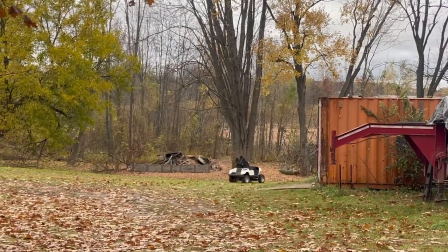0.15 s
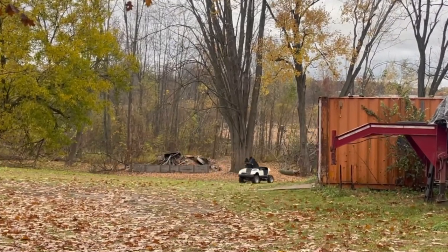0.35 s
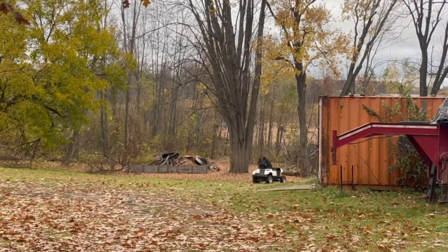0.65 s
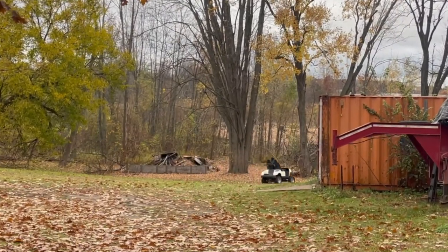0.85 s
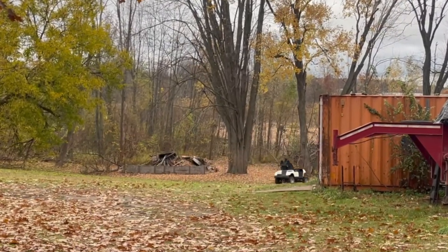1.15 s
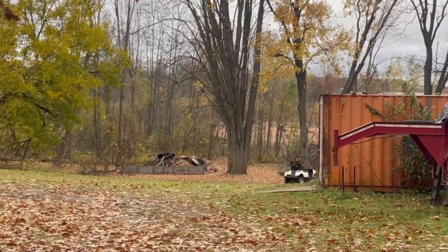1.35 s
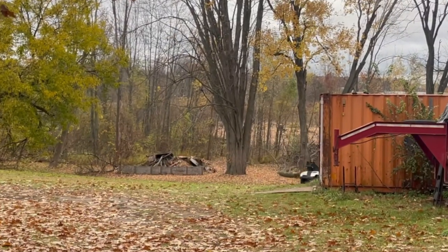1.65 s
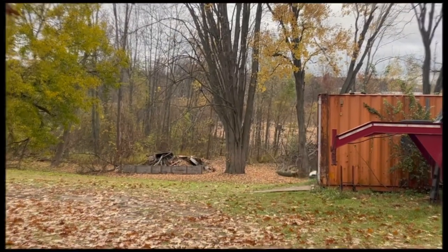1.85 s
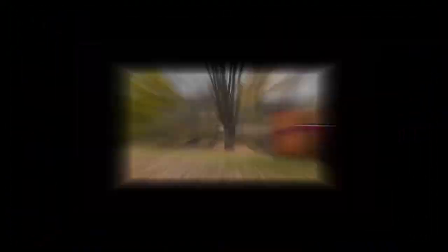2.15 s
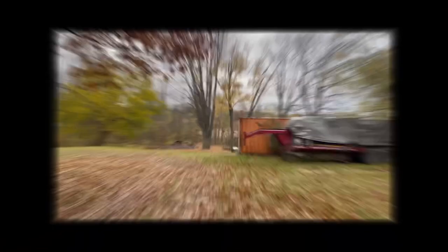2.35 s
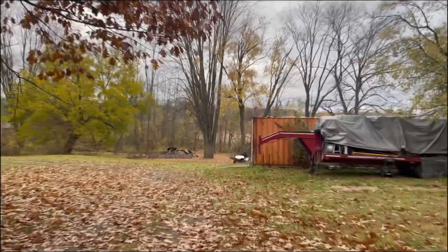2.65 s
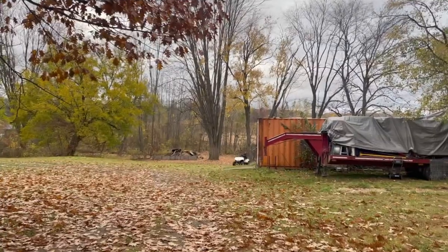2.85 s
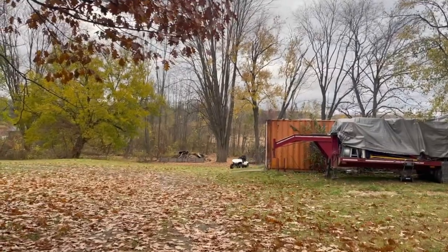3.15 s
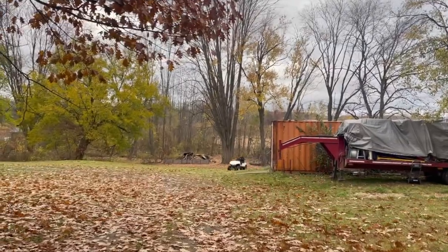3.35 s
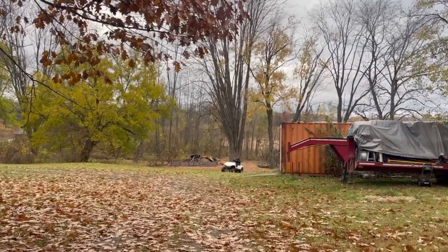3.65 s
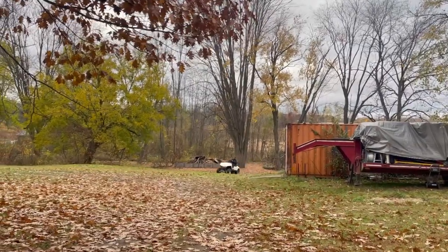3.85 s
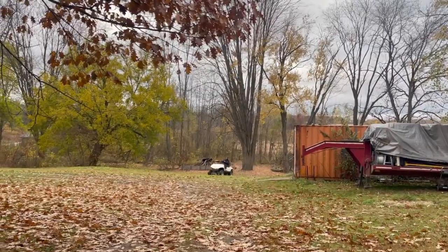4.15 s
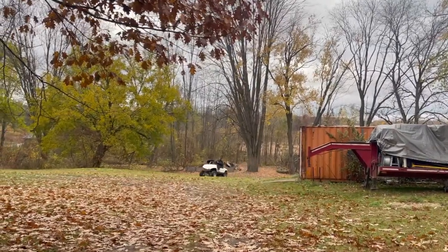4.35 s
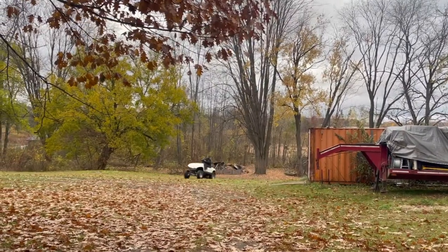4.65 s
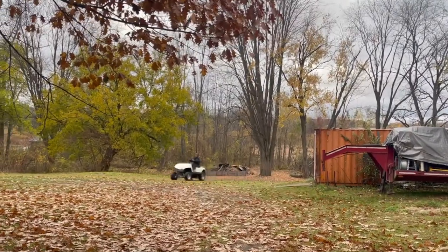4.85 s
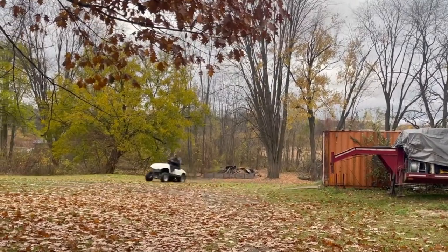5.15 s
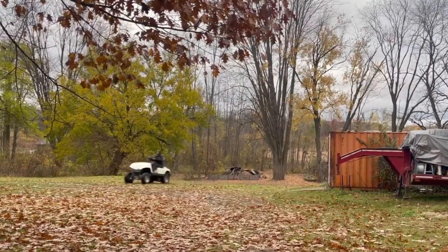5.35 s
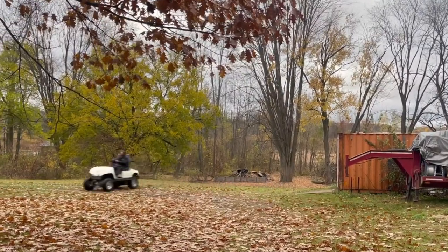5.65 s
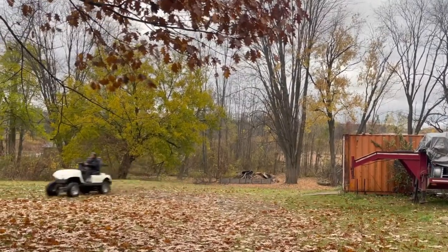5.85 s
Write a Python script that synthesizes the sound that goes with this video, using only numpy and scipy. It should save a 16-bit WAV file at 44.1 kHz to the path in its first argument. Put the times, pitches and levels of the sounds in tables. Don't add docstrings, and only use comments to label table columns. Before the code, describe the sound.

A far-off cart engine idles lumpily, its last thump the strongest, under soft wind rumble. A sudden edit with a small click jumps to quicker, even firing. A faint falling bird whistle follows, then the engine approaches, louder and brighter, with rustling tyres, loose rattles and light metal tinkling. A steel container gives short echoes; a handheld stereo microphone catches gusts in the open yard.

```python
import sys
import numpy as np
from scipy import signal
from scipy.fft import rfft, irfft
from scipy.io import wavfile
from scipy.ndimage import uniform_filter1d

SR = 44100
rng = np.random.default_rng(int(sys.argv[2]) if len(sys.argv) > 2 else 0)


def invert_db(x):
    u = np.asarray(x, float) / 20
    return 10 ** u


def store_wav(level_fs):
    pcm = np.round(np.clip(np.atleast_2d(level_fs), -1, 1) * 32767)
    wavfile.write(sys.argv[1], SR, pcm.T.astype(np.int16))


N = 264600
CUT_S = 2.2356
TIME = np.arange(N) / SR
FREQ = np.maximum(np.arange(N // 2 + 1) * SR / N, 1)
LOG_FREQ = np.log(FREQ)


def unit(x, live=slice(None)):
    return x / np.sqrt(np.mean(x[live] ** 2))


def running_rms(x):
    return np.sqrt(uniform_filter1d(x ** 2, SR // 2))


def columns(table):
    start_s, *rest = np.transpose(table)
    return [np.interp(TIME, start_s, column) for column in rest]


def on_log(hz, values):
    return np.interp(LOG_FREQ, np.log(hz), values)


def noise(gain):
    return irfft(rfft(rng.standard_normal(N)) * gain, N)


def causal(x, db):
    cepstrum = irfft(db * np.log(10) / 20, N)
    cepstrum[1:N // 2] *= 2
    cepstrum[N // 2 + 1:] = 0
    return irfft(rfft(x) * np.exp(rfft(cepstrum)), N)


def split(x, edges_hz, soft=1.074):
    below = [on_log([edge / soft, edge * soft], [1, 0]) for edge in edges_hz] + [1]
    whole = rfft(x)
    return [irfft(whole * (hi - lo), N) for lo, hi in zip([0] + below, below)]


def walk(rate_hz):
    hold = int(SR / rate_hz)
    steps = np.repeat(rng.standard_normal(N // hold + 1), hold)
    return 1.12 * uniform_filter1d(uniform_filter1d(steps, hold), hold)[:N]


def struck(t, hz, t60_s, attack_s):
    return np.minimum(t / attack_s, 1) * np.sin(2 * np.pi * hz * t) * np.exp(-np.log(1000) * t / t60_s)


# [start_s, distance_m]
DISTANCE = [(0, 50.8), (2.23, 59.5), (2.24, 43), (2.6, 35.4), (3.5, 26), (4.3, 26.6), (4.85, 12.8),
            (5.0, 14.8), (5.5, 9.5), (5.66, 6.9), (6, 5.7)]


def approach_db():
    return -20 * np.log10(columns(DISTANCE)[0] / 10)


def crank(hz, live, start, jitter):
    return start + np.cumsum(hz * live) / SR + jitter * walk(25)


# [start_s, firing_hz, load_db, second_tone_db (its part of the load), rasp_db (re load)]
IDLE = [(0.0, 28.74, -33.5, -3.5, -6), (0.25, 28.97, -37.5, -5.5, -0.5), (0.42, 28.04, -34, -5, -5),
        (0.72, 28.18, -36.5, -2, -6.5), (0.92, 29.14, -36, -0.5, -7.5), (1.25, 29.27, -36, -12.5, -5),
        (1.5, 29.4, -38, -7.5, -5), (1.75, 29.66, -37, 0, -8), (2.23, 30.26, -36, -4, -6.5)]
DRIVE = [(2.26, 46.53, -28, -5, -7), (2.41, 46.47, -21, -5, -16.5), (2.54, 46.74, -22.5, -2.5, -14),
         (2.86, 46.36, -22, -3, -13.5), (2.9, 46.35, -24.5, -3, -11.5), (3.69, 47.76, -19.5, -2, -8.5),
         (3.82, 47.25, -20, -1.5, -8.5), (4.03, 48.01, -17, -1, -10.5), (4.13, 47.26, -18, -1.5, -12),
         (4.38, 47.69, -16, -2, -13), (4.82, 47.55, -15.5, -1.5, -11), (4.93, 47.22, -15, -0.5, -13.5),
         (5.09, 48.17, -16.5, -1, -9.5), (5.31, 46.35, -14, -1, -11.5), (5.54, 46.95, -15.5, -2.5, -9.5),
         (5.72, 46.26, -14, -2.5, -11), (5.83, 48.27, -14, -4.5, -9), (5.98, 46.26, -15.5, -3, -5)]
# [start_s, [firing_multiple, level_db]]
IDLE_ORDERS = [
    (1.0, [(1, -30), (2, 21), (3, 18.5), (4, 4), (5, 11.5), (6, -13), (7, -2.5), (8, -11), (9, -9.5), (10, -18), (11, -18), (12, -24.5), (13, -16.5), (14, -31), (15, -29), (16, -27), (17, -47.5), (18, -25.5), (19, -43.5), (20, -36), (21, -50), (22, -33.5), (23, -57.5), (24, -45.5)]),
]
DRIVE_ORDERS = [
    (2.9, [(1, -19), (2, -1.5), (3, 10), (4, -11.5), (5, -14), (6, -10.5), (7, -21.5), (8, -22.5), (9, -22.5), (10, -26.5), (11, -45), (12, -35), (13, -36), (14, -63), (15, -62), (16, -42.5)]),
    (4.4, [(1, -10), (2, 8.5), (3, -3.5), (4, -12), (5, -15.5), (6, -7), (7, -24), (8, -22), (9, -21), (10, -25.5), (11, -34.5), (12, -33.5), (13, -32), (14, -31), (15, -41), (16, -35.5), (17, -42), (18, -39.5), (19, -43.5), (20, -59.5)]),
    (5.5, [(1, -27), (2, -8.5), (3, 4.5), (4, -18), (5, -8), (6, -4.5), (7, -22), (8, -23), (9, -23.5), (10, -25), (11, -33.5), (12, -32), (13, -31), (14, -48.5), (15, -42), (16, -44.5)]),
]
BAND_EDGES_HZ = [105, 165, 310]
# [start_s, lag_ms, share_0_1]
WALL = [(0, 6.7, 0.28), (2.23, 5.2, 0), (2.24, 7.76, 0.39), (4.4, 8.45, 0.29), (5.0, 10.5, 0.46),
        (5.42, 10.85, 0.4), (5.58, 12.9, 0.9), (5.7, 12.3, 0.7), (5.83, 13.2, 0.7), (6, 14.3, 0.3)]
# [start_s, share_0_1]
TAILPIPE = [(0, 0.38), (2.23, 0), (2.24, 0.12), (2.7, 0.5), (3.5, 0.66), (4.2, 0.67), (4.7, 0.88),
            (5.3, 0.82), (6, 0.56)]


def exhaust(turns, live, table, views, air_db, scatter_db, late_ms, late_hz, sweep_ms):
    hz, load_db, second_db, rasp_db = columns(table)
    strength = invert_db(scatter_db * rng.standard_normal(400))
    fires = np.diff(np.floor(turns), prepend=np.floor(turns[0])) > 0
    air = noise(invert_db(air_db + on_log([150, 700], [0, 18])))
    drive = unit(fires * strength[turns.astype(int)], live) + air

    sweep_from_hz, sweep_width_hz = 270, 400
    above = np.maximum(FREQ - late_hz, 0)
    up = np.clip(FREQ - sweep_from_hz, 0, sweep_width_hz)
    cycles = late_ms * above - sweep_ms * up ** 2 / (2 * sweep_width_hz)
    drive = irfft(rfft(drive) * np.exp(-2j * np.pi * cycles / 1000), N)

    mean_hz, heard = hz[live].mean(), 0
    view_s = [start_s for start_s, _ in views]
    for facing, (_, orders) in zip(np.eye(len(views)), views):
        multiple, db = np.transpose(orders)
        points_hz = np.r_[mean_hz / 3, multiple * mean_hz, 1500, 4000]
        response = on_log(points_hz, np.r_[db[0] - 25, db, db[-1] - 22, -130])
        heard = heard + np.interp(TIME, view_s, facing) * causal(drive, response)

    bands = split(heard, BAND_EDGES_HZ)
    lag_ms, share = columns(WALL)
    for i, reach in ((2, 0.4), (3, 1)):
        bands[i] = bands[i] + reach * share * np.interp(TIME - lag_ms / 1000, TIME, bands[i])

    second = np.clip(invert_db(second_db) ** 2, 0, 0.95)
    sway_db = 1.4 * walk(7)
    second = second / (second + (1 - second) * invert_db(sway_db) ** 2)
    away_db, facing_db = -15, -3
    bark_db = away_db + (facing_db - away_db) * columns(TAILPIPE)[0]
    gains = [np.sqrt(1 - second), np.sqrt(second), invert_db(rasp_db), invert_db(rasp_db + bark_db)]
    return invert_db(load_db) * sum(b / running_rms(b) * g for b, g in zip(bands, gains))


# [upper_edge_hz, need_db (over opening level)]
TOP_STRIPS = [(11400, 0.3), (11750, 1.2), (12200, 7), (14000, 13)]


def gate(top, level_db, opens_db):
    edges_hz, needs_db = np.transpose(TOP_STRIPS)
    margin_db = level_db - opens_db + 3 * walk(20)
    soft_db, out = 2, 0
    for strip, need_db in zip(split(top, edges_hz[:-1], soft=1.005), needs_db):
        opening = np.clip((margin_db - need_db + 2.2 * walk(53)) / soft_db, 0, 1)
        out = out + strip * uniform_filter1d(opening, size=300)
    return out


# [level_db (at 10 m), slope (dB per dB of approach)]
IDLE_HISS = [(-47.5, 0.74), (-48, 0.2935), (-24, 2.0041)]
DRIVE_HISS = [(-47, 0.54), (-37.5, 1.036), (-42, 0.98)]
# [freq_hz, level_db (per Hz)]
IDLE_COLOUR = [(290, -25), (500, -2.5), (602, -8.5), (657, -8.5), (762, -4.5), (1300, -11), (1400, -11.5),
               (1860, -8.5), (2570, -11.5), (4330, -12.5), (5220, -15), (6050, -16.5), (7200, -11.5),
               (8780, -1), (9700, -7), (12600, -39), (21300, -120)]
DRIVE_COLOUR = [(410, -20), (700, -5), (942, -5), (1100, -8), (1510, -5.5), (1630, -5.5), (2150, -7),
                (2680, -7.5), (2890, -7), (3810, -8), (5980, -12), (7290, -10.5), (7960, -7.5), (8690, -5),
                (9700, -10), (12600, -42), (21300, -120)]
# [freq_hz, level_db]
TOP = [(9700, 0), (9900, -14), (10080, -70), (10750, -70), (11000, -12), (11900, -14), (12700, -36),
       (13500, -80)]
# [start_s, share_0_1]
CHUFF = [(0, 1), (1.96, 0.97), (2.02, 0.69), (2.23, 0.35), (2.24, 0.76), (6, 1)]


def hiss(turns, live, laws, opens_db, colour, steady, lag, length, scatter_db, crunch):
    roar_db, low_db, high_db = (db + slope * approach_db() for db, slope in laws)
    place = turns - lag
    size = invert_db(scatter_db * rng.standard_normal(400))[np.floor(place).astype(int)]
    phase = place % 1
    burst = columns(CHUFF)[0] * size * (phase / length) ** 1.23 * np.exp(1 - phase / length)
    crushed = (rng.random(N) < 90 / SR) * invert_db(2.0 * rng.exponential(size=N))
    grains = uniform_filter1d(crushed, 130) * 130
    clatter = np.sqrt(burst ** 2 + (crunch * grains) ** 2)
    tone = invert_db(on_log(*np.transpose(colour[:-2])) + on_log(*np.transpose(TOP)))
    bright = invert_db(on_log([1000, 4500], [-17, 0]))
    out, tops = [], []
    for _ in range(2):
        mix = steady * rfft(rng.standard_normal(N)) + bright * rfft(clatter * rng.standard_normal(N))
        bands = split(irfft(mix * tone, N), [1250, 6500, 10450], soft=1.02)
        body, low, high, top = (unit(b, live) for b in bands)
        low = low * invert_db(low_db + 1.25 * walk(9))
        high = high * invert_db(high_db + 0.69 * walk(9))
        out.append(body * invert_db(roar_db) + low + high)
        tops.append(top)
    out[0] = out[0] + gate(tops[0], high_db, opens_db) * invert_db(high_db - 16.5)
    return np.array(out)


BREEZE_DB = (-37.5, -52)
# [peak_s, peak_db, length_s]
GUSTS = [(1.1, -42.5, 0.18), (2.08, -33.5, .12), (2.47, -43, 0.064), (2.86, -32, 0.054), (3.27, -37, 0.082),
         (3.7, -39, .3), (4.45, -35, 0.36), (4.75, -33.5, .12), (5.13, -34.5, .12), (5.62, -33.5, .12),
         (5.9, -35, .2)]


def rumble():
    air = noise(invert_db(on_log([25, 45, 60, 110, 300, 900], [-26, 4, 7.5, 2.5, -23, -130])))
    power = invert_db(np.where(TIME < CUT_S, *BREEZE_DB)) ** 2
    for peak_s, peak_db, length_s in GUSTS:
        power = power + invert_db(peak_db) ** 2 * np.exp(-((TIME - peak_s) / length_s) ** 2)
    return unit(air) * np.sqrt(power) * invert_db(-1 + 2.2 * walk(7))


# [start_s, peak_db, end_pitch_hz]
THUMPS = [(0.209, -21.5, 89), (0.358, -22, 84), (0.428, -29, 78), (1.214, -17, 94.5), (1.323, -28, 90.07),
          (1.37, -25.5, 65.1), (1.469, -22.5, 85), (1.714, -20.5, 75.45), (1.951, -17, 98),
          (2.039, -24, 68.55), (2.077, -31, 62.95), (2.133, -12, 72.6)]


def thumps(glide=2.63, fall_s=0.0055, rise_s=0.012):
    out = np.zeros(N)
    t = TIME[:SR // 8]
    swell = (t / rise_s) ** 1.23 * np.exp(1.36 * (1 - t / rise_s))
    for start_s, peak_db, pitch_hz in THUMPS:
        phase = 2 * np.pi * pitch_hz * (t + glide * fall_s * (1 - np.exp(-t / fall_s)))
        i = int(start_s * SR)
        out[i:i + len(t)] += invert_db(peak_db - 4.5) * swell * np.sin(phase)
    return out


# [level_db (at 10 m), far_slope, close_slope (dB per dB of approach)]
WHINE = (-43, 0.8, 2.2)
# [freq_hz, width_hz, level_db]
WHINE_MODES = [(1666, 69, -0.5), (1837, 33, -0.5), (2622, 100, -5.5), (3197, 110, -9.5)]


def whine():
    db_10m, far, close = WHINE
    level_db = db_10m + np.maximum(far * approach_db() - 0.1, close * approach_db())
    ring = sum(invert_db(db) / (1 + 2j * (FREQ - hz) / width_hz) ** 2 for hz, width_hz, db in WHINE_MODES)
    return unit(noise(ring)) * invert_db(level_db - 4 + 2.2 * walk(12))


# [freq_hz, t60_s, level_db]
RATTLE_MODES = [(1652, .07, 0), (1820, .07, -16), (2640, 0.058, -9), (3090, 0.093, -3), (3510, 0.076, -11),
                (4330, 0.081, -3), (5200, 0.068, -9), (6130, .04, -12), (8400, 0.033, 0),
                (9030, 0.032, 6.5)]


def rattle(count=260):
    out = np.zeros(N + SR)
    t, near_db = TIME[:SR // 20], approach_db() - 36.0
    for when, which, detune, force in rng.random((count, 4)):
        hz, t60_s, db = RATTLE_MODES[int(which * len(RATTLE_MODES))]
        i = int((CUT_S + when * (6 - CUT_S)) * SR)
        size = invert_db(near_db[i] + db - 7.0 - 4.45 * np.log(force + 0.044))
        out[i:i + len(t)] += size * struck(t, hz * (.98 + 0.033 * detune), t60_s, attack_s=0.00096)
    return out[:N]


# [start_s, pitch_hz, level_db]
BIRD = [
    (2.63, 4700, -73),
    (2.65, 4780, -54),
    (2.69, 4500, -59),
    (2.73, 4433, -70),
]


def bird():
    pitch_hz, level_db = columns(BIRD)
    sings = (TIME > BIRD[0][0]) & (TIME < BIRD[-1][0])
    return sings * invert_db(level_db) * np.sin(2 * np.pi * np.cumsum(pitch_hz) / SR)


# [start_s, lower_mode_peak_db, upper_mode_db (re lower)]
TINKLES = [(3.703, -44, -15), (4.0682, -41.5, -13), (4.1574, -39, -7), (4.3919, -41, -11),
           (4.4348, -38, -13), (4.5306, -43, -1), (4.7076, -38, -6), (4.8095, -40, -12), (4.9402, -40.5, 1),
           (4.9866, -48, -10)]
# [freq_hz, t60_s]
TINKLE_MODES = [(7740, 0.18), (8095, 0.3)]


def tinkles():
    out = np.zeros(N)
    t = TIME[:SR // 5]
    for start_s, peak_db, upper_db in TINKLES:
        i = int(start_s * SR)
        for (hz, t60_s), level_db in zip(TINKLE_MODES, (peak_db, peak_db + upper_db)):
            out[i:i + len(t)] += invert_db(level_db) * struck(t, hz, t60_s, attack_s=0.00087)
    return out


def scene():
    early, late = TIME < CUT_S, TIME >= CUT_S
    slow = crank(columns(IDLE)[0], early, start=0.99, jitter=0.021)
    fast = crank(columns(DRIVE)[0], late, start=.8, jitter=0.008)

    idle = hiss(slow, early, IDLE_HISS, opens_db=-53.5, colour=IDLE_COLOUR, steady=0.36, lag=-0.11,
                length=0.11, scatter_db=2.2, crunch=0.035)
    idle[0] += exhaust(slow, early, IDLE, IDLE_ORDERS, air_db=-12, scatter_db=1.2,
                       late_ms=2.93, late_hz=193, sweep_ms=1.5)
    idle[0] += thumps()

    drive = hiss(fast, late, DRIVE_HISS, opens_db=-51.5, colour=DRIVE_COLOUR, steady=1.64, lag=0.44,
                 length=0.23, scatter_db=3.4, crunch=0.49)
    drive[0] += exhaust(fast, late, DRIVE, DRIVE_ORDERS, air_db=-19, scatter_db=.5,
                        late_ms=10.85, late_hz=175.7, sweep_ms=26.0)
    drive[0] += whine() + rattle() + bird() + tinkles()

    out = early * idle + late * drive
    step = late * invert_db(-19.5) * np.exp(-np.maximum(TIME - CUT_S, 0) / 0.0011)
    out[0] += step + rumble()
    return out


def top_cut(x):
    return signal.sosfilt(signal.butter(12, 13420, fs=SR, output="sos"), x)


# [freq_hz, tilt_db (left minus right), left_lead_rad, likeness_0_1]
PORTS = [(35, 1.1, .25, 1), (90, 2.8, .31, 1), (260, 3.3, .36, .99), (430, 5.8, .58, .95),
         (600, 8.3, .1, .85), (860, 8.8, .2, .6), (1200, 7, -1.1, .54), (1700, 5.3, -.3, .58),
         (2400, 6, .4, .8), (3400, 4.8, .7, .87), (4800, 5.2, .65, .85), (6000, 2.3, .27, .86),
         (7000, 5.4, .12, .8), (8000, 1.1, .55, .91), (9000, .4, -.6, .9), (9600, .2, -2.1, .87),
         (10400, .2, 0, .93)]


def record(dry):
    hz, tilt_db, lead_rad, likeness = np.transpose(PORTS)
    share = np.clip(on_log(hz, likeness), 0, 1)
    mix = np.sqrt((1 + share) / 2) * rfft(dry[0])
    apart = np.sqrt((1 - share) / 2) * rfft(dry[1])
    turn = invert_db(on_log(hz, tilt_db) / 2) * np.exp(.5j * on_log(hz, lead_rad))
    norm = 2 / np.abs(turn + 1 / turn).clip(1.2)
    left = irfft((mix + apart) * turn * norm, N)
    right = irfft((mix - apart) / turn * norm, N)
    return top_cut(np.array([left, right]))


dry = scene()
out = record(dry)
store_wav(out)
```